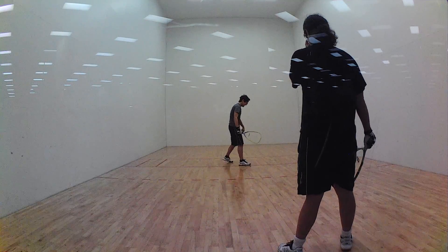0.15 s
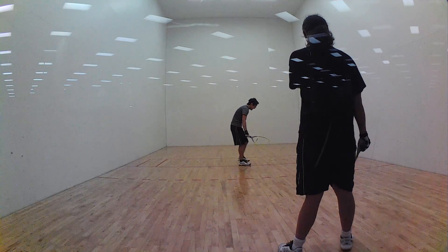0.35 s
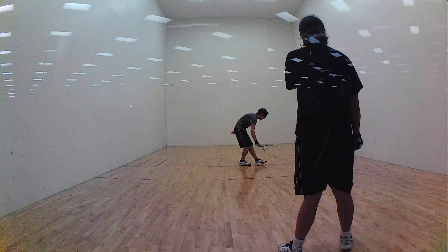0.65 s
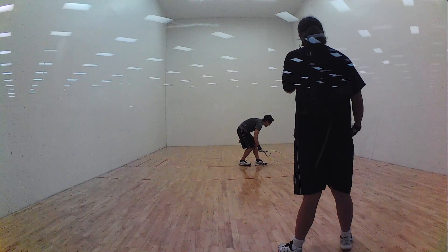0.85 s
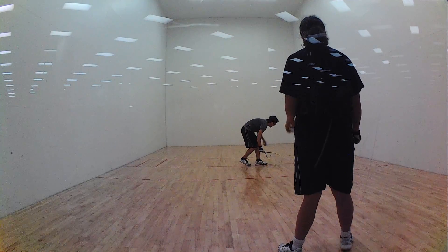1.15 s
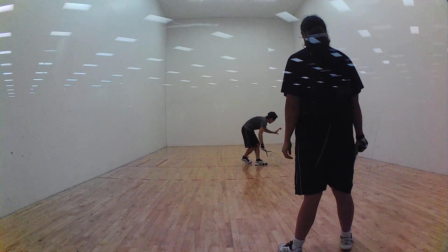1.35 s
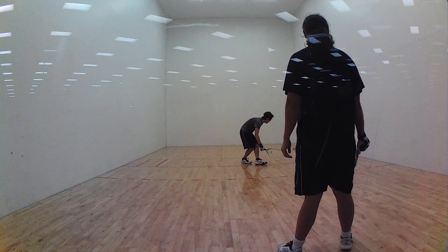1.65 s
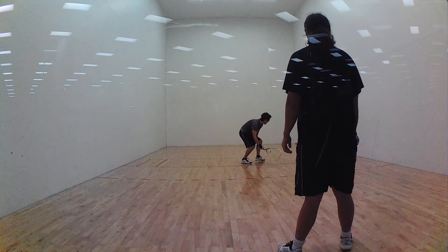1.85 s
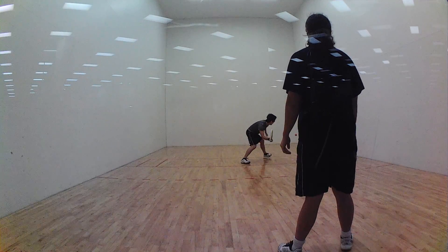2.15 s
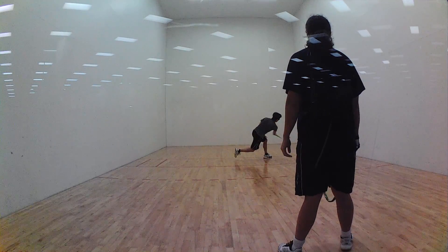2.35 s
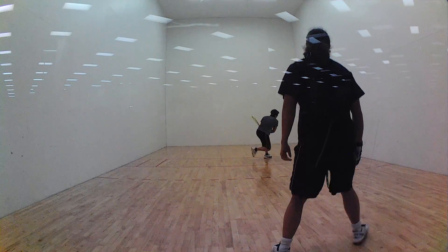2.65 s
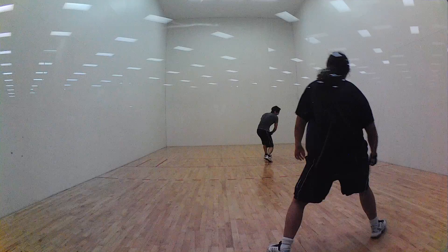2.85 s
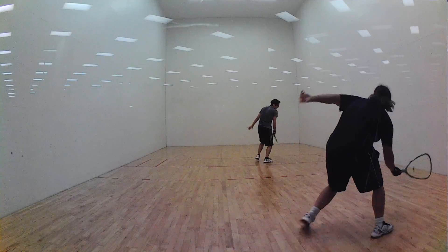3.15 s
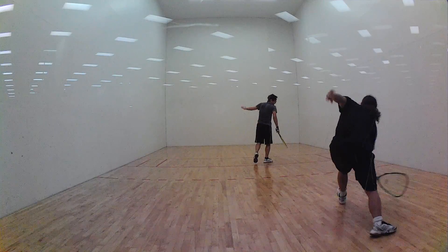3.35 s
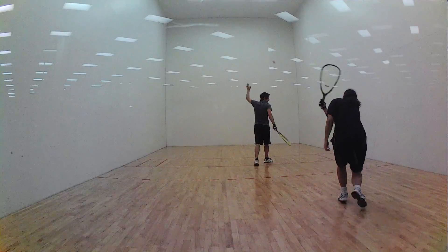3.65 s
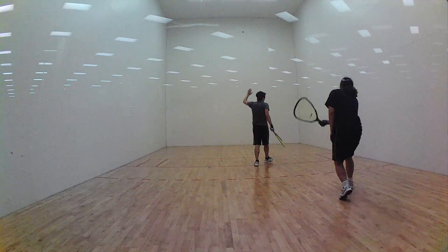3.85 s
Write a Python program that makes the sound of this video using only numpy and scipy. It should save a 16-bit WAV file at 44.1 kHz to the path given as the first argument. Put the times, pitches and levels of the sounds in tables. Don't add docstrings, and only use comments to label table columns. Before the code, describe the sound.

A ball's hollow bounce and sharp racquet hit echo through a bare indoor court with squeaking shoes

```python
import sys
import numpy as np
from scipy import signal
from scipy.io import wavfile
from scipy.ndimage import uniform_filter1d

SR = 44100
rng = np.random.default_rng(int(sys.argv[2]) if len(sys.argv) > 2 else 0)


def decibels_to_gain(level_db):
    exponent = np.asarray(level_db, float) / 20
    return 10 ** exponent


def generate_wav(signal):
    frames = np.transpose(np.atleast_2d(signal))
    scaled = np.clip(frames, -1, 1) * 32767
    pcm = np.round(scaled).astype(np.int16)
    wavfile.write(sys.argv[1], SR, pcm)


N = 176400

# f/Hz, density/dB
AIR_SPECTRUM = [(25, -5.5), (70, -5.5), (230, 0.5), (600, -5.5), (1600, -6.5), (2400, -9.5), (3500, -22),
                (9000, -38)]
AIR_DB, SWELL_DB, PATCH_DB = -45, 0.6, 1.58

# t/s, f/Hz, level/dB
HUM_COURSE = [(0, 387.8, -51), (.45, 389.2, -46), (.8, 389.6, -53.5), (1.05, 381.6, -45),
              (1.377, 386.6, -42.5), (1.538, 392.1, -46.5), (2.05, 388, -41.5), (2.28, 391.6, -46),
              (2.4, 394.2, -52.5), (2.998, 388.3, -51), (3.2, 387.5, -46.5), (3.461, 390, -56.5),
              (4, 385, -44.5)]
HUM_FUZZ_DB, HUM_FUZZ_HZ, NINTH_DB = -17, 12, -24
# f/Hz, level/dB
FAN_TONES = [(216, -63), (254, -62), (1775, -62.5), (1890, -63.5)]

# f/Hz, t60/s
EARLY_DECAY = [(80, 0.14), (300, 0.11), (1000, 0.65), (3000, 0.52), (8000, 0.1)]
# f/Hz, t60/s
LATE_DECAY = [(80, 0.47), (300, 2.75), (1000, 5.85), (2000, 2.5), (4000, 4), (8000, 1.6)]
# f/Hz, level/dB
LATE_START = [(80, -22), (300, -1), (1000, -19), (3000, -8.5), (8000, -10.5)]

# start t/s, length/s, level/dB, first f/Hz, last f/Hz
SQUEALS = [
    (2.693, .13, -29, 1230, 896),
    (2.96, 0.085, -28.5, 1039, 957.8),
    (3.219, 0.074, -38.5, 1270, 1242),
    (3.495, 0.092, -35.5, 1264, 1026),
]
# start t/s, length/s, level/dB, first f/Hz,
# last f/Hz
CHIRPS = [(2.335, .12, -47, 1590, 1578), (2.32, .04, -52, 2620, 2610), (2.42, .07, -55, 3120, 3110),
          (2.42, .09, -63, 3620, 3620), (2.615, .035, -46, 2650, 2640), (3.08, .045, -50, 2700, 2690),
          (2.95, .03, -52, 2690, 2690), (.86, .025, -60, 2880, 2880), (1.72, .04, -52, 2330, 2330),
          (3.53, .04, -52, 2360, 2350), (2.67, .006, -43, 3750, 3700), (2.7, .24, -47, 2290, 2260),
          (2.84, .07, -50, 2930, 2920)]
# start t/s, length/s, level/dB, first f/Hz, last f/Hz
SLIPS = [(2.633, 0.014, -18, 1112, 1160), (2.666, .014, -18, 1248, 1296), (2.694, 0.026, -26.5, 948, 932),
         (2.716, .03, -22, 1064, 1035), (2.768, .05, -26, 914.4, 885), (2.84, .03, -26, 971, 1000),
         (2.903, 0.029, -27, 920, 948), (2.963, 0.017, -28.5, 947, 965), (3.003, 0.024, -29.5, 954.5, 1020),
         (3.031, 0.012, -21.5, 1058, 1026), (3.197, 0.034, -30, 984, 979), (3.268, .05, -41, 1282, 1255),
         (3.391, 0.025, -29.5, 990, 979), (3.44, 0.031, -37.5, 1274, 1262),
         (3.52, 0.048, -38.5, 1270, 1280), (3.608, 0.024, -29.5, 1052, 1073),
         (3.698, 0.045, -40, 1530, 1594)]
# start t/s, length/s, level/dB, first f/Hz, last f/Hz
SLIDE_START = (2.655, .06, -22, 1270, 1255)
# start t/s, length/s, level/dB, low f/Hz, high f/Hz
SCUFFS = [
    (1.851, 0.5, -55.5, 835, 1610),
    (2.07, 0.055, -62.5, 2850, 4160),
    (2.208, 0.16, -59.5, 1970, 4100),
    (2.455, 0.12, -36.5, 812, 1297),
    (2.613, 0.16, -31, 868, 1390),
    (2.971, 0.09, -54, 853, 1310),
    (3.578, 0.26, -41, 700, 1276),
]
OVERTONES_DB = [-3, -20, -31]
SQUEAL_WOBBLE, CHIRP_WOBBLE, SLIP_WOBBLE = 0.0507, 0.003, 0.008
SQUEAL_GRIP_DB, SLIP_GRIP_DB = 4, 1.5
CHIRP_ECHO_DB, SLIP_ECHO_DB = -8, -3
SQUEAK_WET_DB, SQUEAK_LATE_DB = 2, 25

# t/s, f/Hz, level/dB, t60/s
CAVITY_NOTES = [(0.89, 280, -29, 0.075), (.882, 260, -28.5, 0.046), (.878, 500, -27, 0.034),
                (.935, 950, -33.5, 0.061), (.97, 484, -33, 0.083), (.864, 1330, -27.5, 0.015),
                (.924, 220, -25.5, 0.042), (0.959, 236, -37, .05), (2.567, 240, -17.5, 0.016),
                (2.576, 397, -18.5, .06), (2.588, 200, -21.5, 0.049), (2.607, 190, -27, 0.035),
                (2.623, 235, -25.5, 0.072), (2.569, 112, -29.5, 0.11), (2.6, 85, -34.5, .3),
                (2.68, 100, -32.5, 0.21), (2.74, 205, -27.5, 0.12), (0.83, 100, -43.5, .3)]
CAVITY_ECHO_DB = -6.5

# t/s, thud level/dB, pop level/dB, tick level/dB, echo level/dB
HITS = [(.531, -44.5, -47.5, -54.5, 10), (.784, -38.5, -46, -55.5, 13.5), (.8585, -29.5, -20.5, -45.5, -1),
        (1.345, -51, -56, -51, 3.5), (1.5, -53, -53.5, -67.5, 0.5), (1.734, -66, -54, -52, 0),
        (2.3, -59.5, -53.5, -54.5, 8.5), (2.435, -50.5, -47.5, -69.5, 17.5),
        (2.567, -23.5, -25.5, -38.5, 7), (2.579, -47, -23.5, -42, 10), (2.672, -43.5, -23.5, -50.5, 7),
        (2.717, -31, -29.5, -54.5, 8), (2.965, -59, -24.5, -53, -3.5), (3.085, -47, -36.5, -49, 16.5),
        (3.507, -38, -38.5, -72.5, 14.5)]
# f/Hz, level/dB, t60/s
THUD_MODES = [(65, 0, .06), (110, 2, .045), (165, 2, .035), (240, 1, .03), (340, 0, .022)]
# f/Hz, level/dB, t60/s
POP_MODES = [(620, -3, .008), (950, 1, .007), (1250, 2, .007), (1700, -3, .005), (2200, -5, .006)]
# f/Hz, level/dB, t60/s
TICK_MODES = [(3313, -12, 0.015), (4050, -7.5, 0.0033), (5800, 2, 0.00061), (7540, -2, 0.0012)]
# f/Hz, level/dB, t60/s
GLASS_MODES = [(5850, -3, .15), (6750, -2, .4), (7020, 0, .3), (7610, -2, .3), (7800, -1, .3)]
GLASS_S = [3.086, 3.175, 3.243]
GLASS_DB = [-52, -55, -53]
# delay t/s, level/dB
ARRIVALS = [
    (0, -1),
    (.0042, 1),
    (.0078, 1),
    (.0109, -6),
    (.022, -5),
    (.03, -9),
]
DETUNE = 0.04

# f/Hz, level/dB
MIC_RESPONSE = [(25, -4), (60, -2), (1950, 0.5), (2200, -2.5), (2400, -8.5), (2800, -5.5), (3250, -3),
                (8900, 1), (9900, -18)]
# low f/Hz, high f/Hz
LOST_BAND = (4610, 5480)
# low f/Hz, high f/Hz,
# level/dB
GATES = [(2024, 3200, -69.5), (8800, 7700, -104)]
CEILING = 0.18


def evened(x):
    return x / np.sqrt(np.mean(x ** 2) + 1e-20)


def read(points, hz):
    f, value = np.transpose(points)
    return np.interp(np.log(hz + 1), np.log(f + 1), value)


def add(mix, s, sound):
    part = mix[round(s * SR):][:len(sound)]
    part += sound[:len(part)]


def drift(count, span):
    smooth = uniform_filter1d(rng.standard_normal(count), int(span))
    return evened(uniform_filter1d(smooth, int(span)))


def ring(modes, detune, seconds=0.17):
    t = np.arange(0, seconds, 1 / SR)
    x = np.zeros(len(t))
    for k, ((hz, db, t60), shift) in enumerate(zip(modes, detune)):
        onset = np.minimum(t * hz / 0.9, 1)
        x += (-1) ** k * decibels_to_gain(db - 60 * t / t60) * np.sin(2 * np.pi * hz * (1 + shift) * t) * onset
    return x / abs(x).max()


def court(x, extra_db):
    taps = np.zeros(2 * SR)
    at = np.arange(200, 2 * SR - 20, 20)
    taps[at + rng.integers(0, 20, len(at))] = rng.choice([-1., 1.], len(at))
    hz, t, z = signal.stft(taps, SR, nperseg=256)
    early = decibels_to_gain(-60 * t / read(EARLY_DECAY, hz)[:, None])
    late_start_db = read(LATE_START, hz) + extra_db
    late = decibels_to_gain(late_start_db[:, None] - 60 * t / read(LATE_DECAY, hz)[:, None])
    tail = signal.istft(z * np.hypot(early, late), SR, nperseg=256)[1]
    return signal.fftconvolve(x, tail / np.linalg.norm(tail))[:N]


def air():
    frames, hz = N // 256 + 5, np.fft.rfftfreq(1024, 1 / SR)
    real, imag, patches = rng.standard_normal((frames, 513, 3)).T
    patches = uniform_filter1d(patches, 10, 0)
    patches = evened(uniform_filter1d(patches, 12, 1))
    swell_db = SWELL_DB * drift(frames, 17)
    z = (real + 1j * imag) * decibels_to_gain(read(AIR_SPECTRUM, hz)[:, None] + PATCH_DB * patches + swell_db)
    noise = signal.istft(z, nperseg=1024, noverlap=768)[1][:N]
    return decibels_to_gain(AIR_DB) * evened(noise)


def hum():
    t = np.arange(N) / SR
    s, hz, db = np.transpose(HUM_COURSE)
    span = SR / HUM_FUZZ_HZ / 2
    fuzz = decibels_to_gain(HUM_FUZZ_DB) * (drift(N, span) + 1j * drift(N, span))
    turn = np.exp(2j * np.pi * np.cumsum(np.interp(t, s, hz)) / SR)
    ninth = decibels_to_gain(NINTH_DB) * (turn ** 9).real
    total = decibels_to_gain(np.interp(t, s, db)) * (((1 + fuzz) * turn).real + ninth)
    for f, level_db in FAN_TONES:
        level = decibels_to_gain(level_db + 1.3 * drift(N, 3800))
        total += level * np.sin(2 * np.pi * f * t + 1.2 * drift(N, 7100))
    return np.sqrt(2) * total


def squeak(s, length, db, first_hz, last_hz, shake, overtones_db, grip_db):
    u = np.arange(0, 1, 1 / (length * SR))
    wobble = drift(SR, 65.5)[:len(u)]
    grip = drift(SR, 166)[:len(u)]
    hz = (first_hz + (last_hz - first_hz) * u) * (1 + shake * wobble)
    turn = 2 * np.pi * np.cumsum(hz) / SR
    tone = sum(decibels_to_gain(g) * np.sin((k + 1) * turn) for k, g in enumerate(overtones_db))
    envelope = np.clip(np.minimum(u / 0.25, (1 - u) / 0.09), 0, 1)
    return s, decibels_to_gain(db + grip_db * grip) * envelope * tone


def scuff(s, length, db, lo_hz, hi_hz):
    u = np.arange(0, 1, 1 / (length * SR))
    grit = rng.standard_normal(SR) * decibels_to_gain(3.1 * drift(SR, 36))
    sos = signal.butter(4, [lo_hz, hi_hz], "band", fs=SR, output="sos")
    band = evened(signal.sosfilt(sos, grit))[:len(u)]
    envelope = np.clip(np.minimum(u / 0.2, (1 - u) / 0.13), 0, 1)
    return s, decibels_to_gain(db) * band * envelope


def squeaks():
    far, near, slips = np.zeros((3, N))
    for row in SLIPS:
        add(slips, *squeak(*row, SLIP_WOBBLE, OVERTONES_DB, SLIP_GRIP_DB))
    for row in SQUEALS:
        add(far, *squeak(*row, SQUEAL_WOBBLE, OVERTONES_DB, SQUEAL_GRIP_DB))
    for row in CHIRPS:
        add(near, *squeak(*row, CHIRP_WOBBLE, [0], SLIP_GRIP_DB))
    add(slips, *squeak(*SLIDE_START, CHIRP_WOBBLE, [0], SLIP_GRIP_DB))
    for row in SCUFFS:
        add(far, *scuff(*row))
    into_room = far + decibels_to_gain(CHIRP_ECHO_DB) * near + decibels_to_gain(SLIP_ECHO_DB) * slips
    return far + near + slips + decibels_to_gain(SQUEAK_WET_DB) * court(into_room, SQUEAK_LATE_DB)


def cavity():
    x = np.zeros(N)
    for s, hz, db, t60 in CAVITY_NOTES:
        add(x, s, decibels_to_gain(db) * ring([(hz, 0, t60)], [0]))
    return x + decibels_to_gain(CAVITY_ECHO_DB) * court(x, 0)


def hits():
    dry, spots = np.zeros(N), np.zeros((3, N))
    chance = rng.uniform(-1.5, 1, (len(HITS), 12))
    for k, (s, thud_db, pop_db, tick_db, echo_db) in enumerate(HITS):
        detune = DETUNE * chance[k]
        pop = decibels_to_gain(pop_db) * ring(POP_MODES, detune)
        sharp = decibels_to_gain(tick_db) * ring(TICK_MODES, detune) - pop
        thud = decibels_to_gain(thud_db) * ring(THUD_MODES, detune)
        add(dry, s, thud)
        for (late_s, db), shift in zip(ARRIVALS, chance[k, 6:]):
            add(dry, s + late_s * (1 + 0.04 * shift), decibels_to_gain(db) * sharp)
        add(spots[k % 3], s, decibels_to_gain(echo_db) * (thud + 2 * sharp))
    for s, db in zip(GLASS_S, GLASS_DB):
        detune = rng.uniform(-0.005, 0.0024, len(GLASS_MODES))
        add(spots[1], s, decibels_to_gain(db) * ring(GLASS_MODES, detune, 0.5))
    return dry + sum(court(x, 0) for x in spots)


def scene():
    return (hits() + squeaks() + air() + hum() + cavity())[None]


def top_cut(x):
    return signal.sosfilt(signal.butter(12, 9850, fs=SR, output="sos"), x)


def record(dry):
    soft = CEILING * np.tanh(dry[0] / CEILING)
    hz, t, z = signal.stft(soft, SR, nperseg=2048, noverlap=1024)
    passed = (hz < LOST_BAND[0]) | (hz > LOST_BAND[1])
    z = z * (decibels_to_gain(read(MIC_RESPONSE, hz)) * passed)[:, None]
    line_db = 10 * np.log10(uniform_filter1d(abs(z) ** 2, size=3, axis=0) + 1e-14)
    keep = np.ones(z.shape)
    for lo_hz, hi_hz, db in GATES:
        band = (hz >= lo_hz) & (hz < hi_hz)
        keep[band] = np.clip((line_db[band] - db) / 2.0, 0, 1)
    mix = signal.istft(z * keep, SR, nperseg=2048, noverlap=1024)[1][None, :N]
    return top_cut(mix)


dry = scene()
out = record(dry)
generate_wav(out)
```